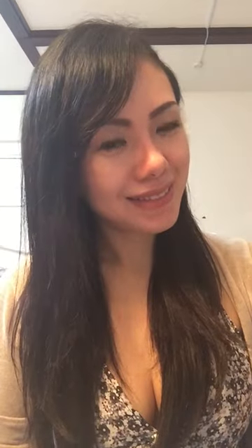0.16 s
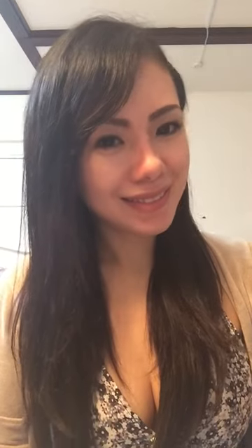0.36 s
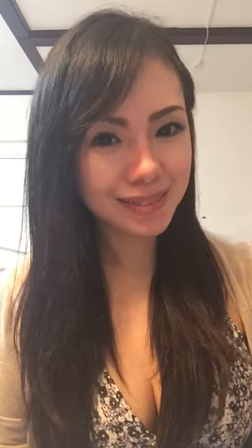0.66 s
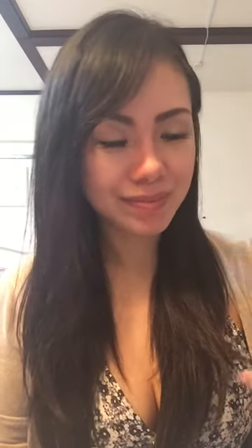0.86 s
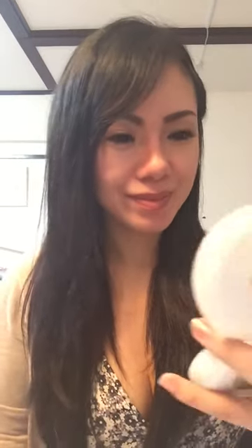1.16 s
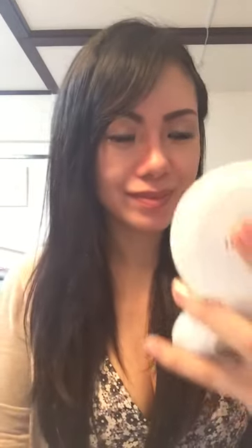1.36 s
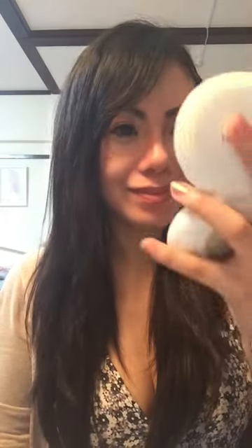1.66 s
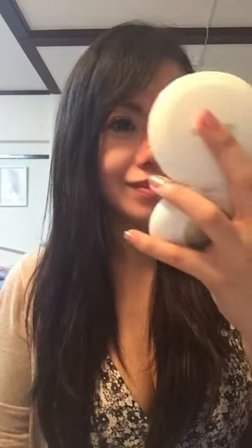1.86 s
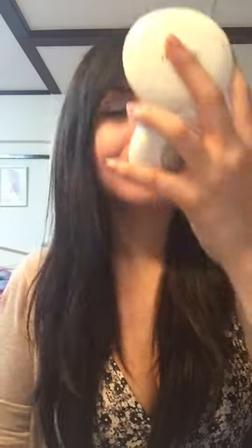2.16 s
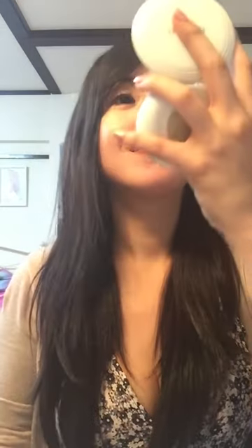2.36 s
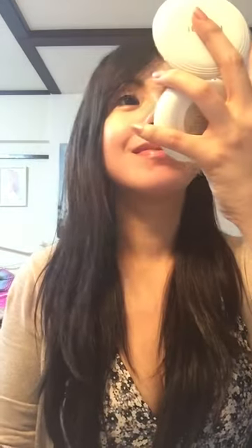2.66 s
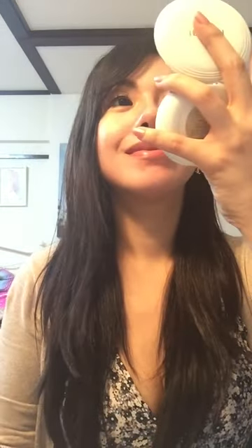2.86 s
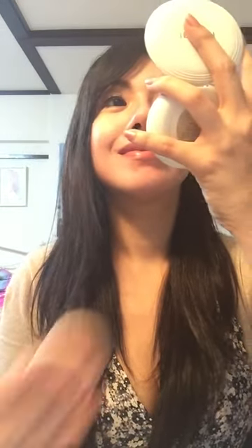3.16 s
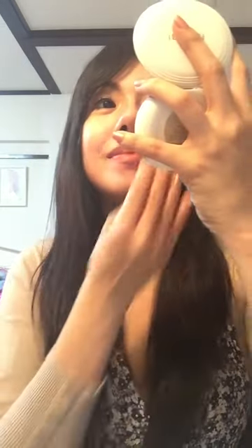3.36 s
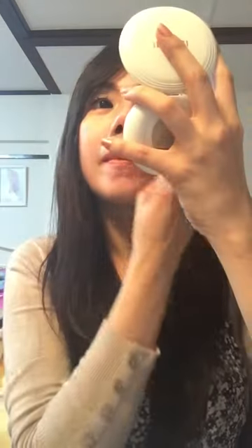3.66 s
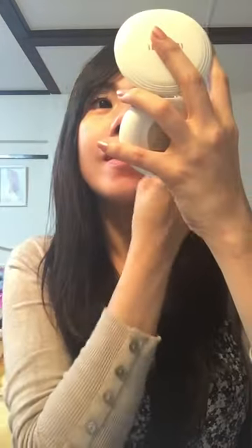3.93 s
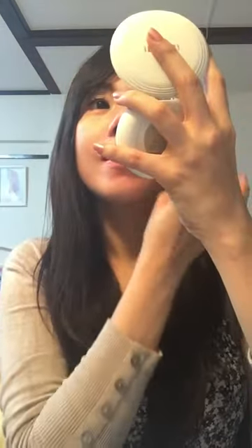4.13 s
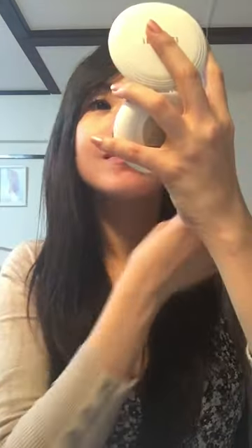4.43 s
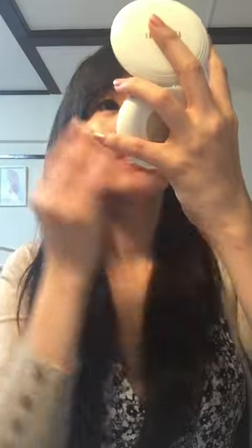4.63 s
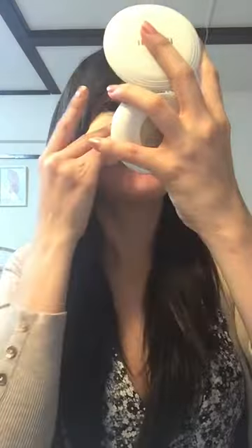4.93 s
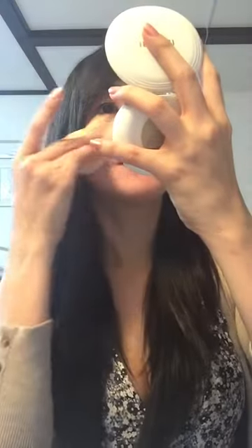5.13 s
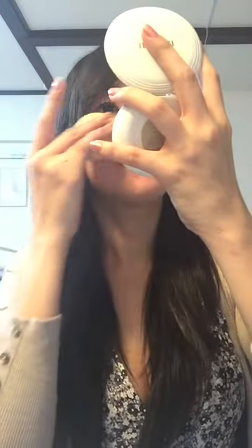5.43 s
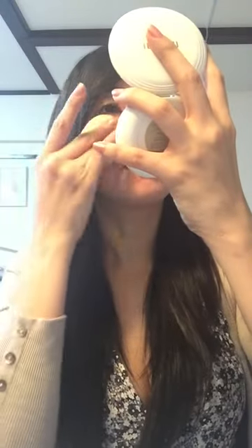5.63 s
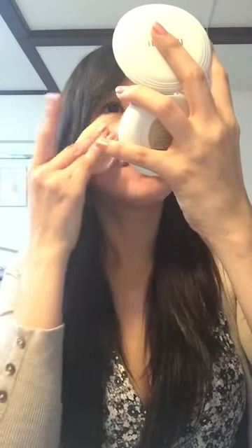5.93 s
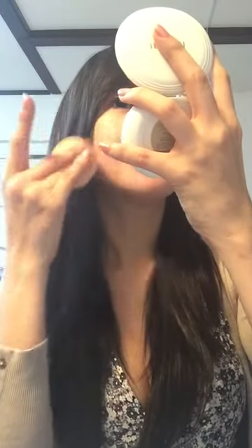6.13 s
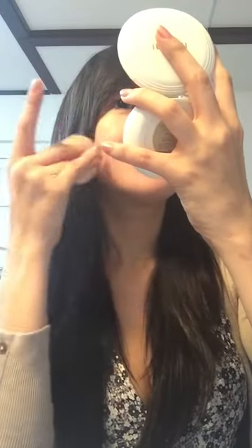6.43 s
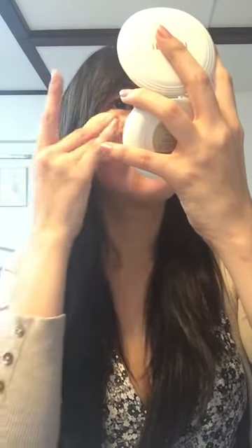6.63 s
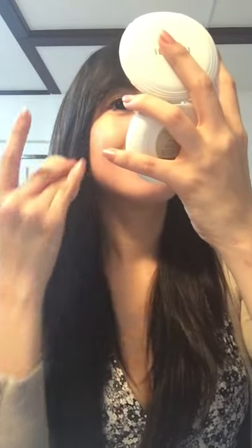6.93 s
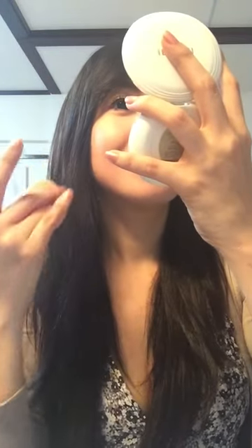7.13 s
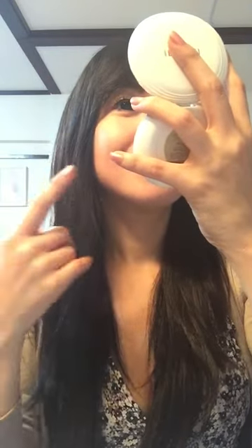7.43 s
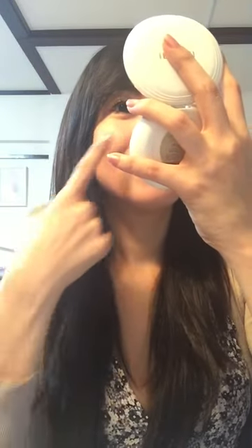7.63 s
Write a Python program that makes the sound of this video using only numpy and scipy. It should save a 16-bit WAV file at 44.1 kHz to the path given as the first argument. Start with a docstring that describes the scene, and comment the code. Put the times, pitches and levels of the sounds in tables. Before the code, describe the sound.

A brief finger slide and low handling bumps open the sound close to the microphone. After a quiet second, stiff plastic film on a small hollow compact crackles in dense bright snaps, then in sparser sharp pops, and finally in a loud crisp flurry. Small soft room, faint hum and hiss behind.

```python
"""A finger sliding off a phone is heard first; sharp snaps and fine rustling of crinkly film stand out.
The film wraps a plastic compact: snaps are short filtered noise bursts, rustle is random pops and
rubbing noise through ringing creases, and the hollow case knocks through its resonances.
A small soft room adds a fading noise tail. The hand on the phone makes resonant sliding noise, low
ringing bumps and a rumble of slipping skin; behind it lies coloured noise, a low hum and microphone hiss."""
import sys
import numpy as np
from scipy import signal
from scipy.fft import rfft, irfft
from scipy.io import wavfile
from scipy.ndimage import uniform_filter1d

SR = 44100
rng = np.random.default_rng(int(sys.argv[2]) if len(sys.argv) > 2 else 0)


def store_wav(level_fs):
    """Save 16-bit WAV to argv[1]."""
    pcm = np.round(np.clip(np.atleast_2d(level_fs), -1, 1) * 32767)
    wavfile.write(sys.argv[1], SR, pcm.T.astype(np.int16))


N = 343759

# the film buckles: t/s, level/dB, body 1-3 kHz relative to it [level/dB],
# treble 7-16 kHz relative to it [level/dB], ring [f/Hz], length [ms]
FILM_SNAPS = [(0.1847, -48, -11, -8, 3380, 2.0), (0.2199, -39, -16, -15, 1990, 3),
              (0.6215, -41.5, -29.5, -17.5, 6400, 1.8), (0.8525, -46.5, -17.5, -19, 6760, 2.0),
              (1.1815, -33.5, -18, -20, 2330, 2.3), (1.2306, -27.5, -13, -13, 1660, 2.4),
              (1.2358, -26.5, -11, -14, 3250, 3), (1.3149, -46, -17, -11, 1570, 2.0),
              (1.3393, -35.5, -17, -18, 1410, 1.6), (1.3616, -37.5, -14, -15, 2960, 2.8),
              (1.5477, -29.5, -19, -24, 5460, 2.3), (1.5688, -15, -18.5, -12.5, 2330, 4.5),
              (1.5828, -19.5, -24, -14, 5400, 1.7), (1.5952, -30.5, -12, -16, 1480, 2.7),
              (1.6072, -17.5, -34.5, -19, 5000, 2.0), (1.6818, -31.5, -19, -12, 1610, 4.2),
              (1.6983, -19.5, -18, -11.5, 2490, 4.6), (1.807, -25.5, -18.5, -12, 2460, 2.5),
              (1.8174, -20.5, -26, -10, 1790, 4.3), (1.8518, -34, -14, -15, 2500, 2.6),
              (1.863, -30.5, -13.5, -9, 2540, 2.6), (1.8923, -39.5, -7, -12, 1530, 2.9),
              (1.9057, -17.5, -25.5, -11, 5500, 4.8), (1.939, -25, -27, -19.5, 4000, 2.6),
              (2.0474, -18, -28.5, -14.5, 6600, 2.5), (2.062, -28.5, -21, -10, 5550, 2.0),
              (2.0717, -24, -23, -16, 7220, 5.1), (2.117, -38, -14, -15, 2240, 2.0),
              (2.146, -34, -15, -6, 4300, 1.7), (2.1558, -15.5, -23.5, -16, 3930, 3.4),
              (2.2188, -30, -18.5, -19, 2250, 3), (2.2538, -34.5, -17, -10, 1990, 2.8),
              (2.2751, -15.5, -29.5, -11.5, 6300, 1.2), (2.2988, -18.5, -30, -21, 3980, 2.2),
              (2.3274, -20, -33, -14, 4740, 2.4), (2.3557, -24.5, -16.5, -11.5, 2280, 4.5),
              (2.3871, -20.5, -31, -8, 7300, 1.4), (2.3949, -18.5, -18.5, -11, 1550, 4.3),
              (2.4927, -43.5, -1.5, -32, 1540, 1.1), (2.5422, -38, -19, -21, 7070, 3.1),
              (2.588, -18.5, -17.5, -14, 3980, 1.9), (2.8044, -39, -13, -12, 2540, 3.4),
              (2.8238, -34, -19, -13, 2530, 3.4), (2.8502, -17.5, -19, -27, 2450, 1.6),
              (2.9157, -30.5, -11.5, -18, 1970, 2.2), (2.9427, -34.5, -12, -13, 1990, 2.5),
              (2.952, -34, -15, -11, 1560, 2.0), (3.001, -25, -17.5, -8.5, 1510, 3.1),
              (3.056, -31, -19, -13, 6860, 2.6), (3.0692, -30.5, -18, -9.5, 3050, 2.0),
              (3.102, -35, -12.5, -5.5, 1910, 2.6), (3.1636, -14, -43, -21, 5140, 1.3),
              (3.2261, -31, -28, -12.5, 3450, 5.3), (3.2492, -23, -29.5, -24, 6440, 2.9),
              (3.2678, -18, -29, -18, 3800, 1.8), (3.504, -9, -31, -18.5, 5230, 2.0),
              (3.516, -28, -33, -13, 5260, 3.9), (3.523, -16.5, -26.5, -22, 3700, 1.8),
              (3.5597, -12.5, -33.5, -12, 6060, 4.8), (3.5852, -17.5, -36.5, -24.5, 4860, 1.7),
              (3.703, -49.5, -8, -18, 1940, 1.5), (3.7591, -29, -22, -15.5, 5130, 2.7),
              (3.7848, -22.5, -26.5, -23, 5300, 2.4), (4.2857, -34, -38.5, -28, 4970, 1.7),
              (4.34, -27, -15.5, -10.5, 2200, 3), (4.3938, -3.5, -33, -18.5, 4380, 2.2),
              (4.4611, -36, -11.5, -30, 2960, 2.3), (4.4878, -34.5, -18, -26, 3130, 2.8),
              (4.977, -38, -33, -14, 2790, 1.6), (4.994, -22, -24.5, -20.5, 4400, 2.5),
              (5.0564, -51, -6, -17, 2180, 1.9), (5.0953, -20.5, -27, -29.5, 4980, 1.4),
              (5.1072, -25.5, -31, -14, 5880, 1.2), (5.1513, -25.5, -29, -12, 5250, 1.4),
              (5.1698, -23.5, -33, -13, 5170, 4.5), (5.1968, -32, -22, -7, 4550, 2.2),
              (5.2119, -13, -31.5, -9.5, 5030, 1.6), (5.223, -15, -38, -27, 4730, 2.0),
              (5.2367, -29, -26, -9, 5300, 2.3), (5.2672, -24, -25.5, -25, 4160, 2.3),
              (5.2867, -37, -11, -18, 4120, 2.9), (5.294, -42, -10, -8, 5000, 2.0),
              (5.308, -22.5, -18.5, -13.5, 4050, 2.0), (5.359, -37.5, -20, -24, 4040, 3),
              (5.3961, -39, -25, -24, 5800, 2.7), (5.448, -10, -34.5, -11, 6000, 1.2),
              (5.585, -33.5, -20, -26, 3260, 2.0), (5.6316, -34, -14.5, -8, 6120, 0.95),
              (5.6362, -7, -34, -15.5, 7000, 2.4), (5.6898, -32.5, -21, -16, 4700, 3.2),
              (5.7124, -35.5, -14, -22, 2850, 1.6), (5.744, -47, -14, -11, 2470, 2.9),
              (5.8853, -10, -47.5, -13, 7500, 1.5), (6.0338, -35, -36, -10.5, 4160, 2.4),
              (6.0778, -43.5, -0.5, -18, 2950, 2.2), (6.0806, -33, -13.5, -6.5, 2860, 2.3),
              (6.1027, -16, -30, -12, 3250, 1.2), (6.1507, -37, -13, -15, 1740, 2.0),
              (6.2256, -21, -24.5, -17, 5600, 2.3), (6.2455, -46, -6, -16, 1930, 2.2),
              (6.256, -34, -13, -21, 1930, 2.0), (6.2954, -30, -21, -16, 2930, 2.5),
              (6.3045, -27.5, -20, -3, 6500, 1.4), (6.3075, -12.5, -27, -10.5, 2800, 2.2),
              (6.3178, -30, -28, 2, 1950, 2.2), (6.3313, -25.5, -11.5, -18, 3670, 2.6),
              (6.351, -22, -23.5, -8, 4600, 2.0), (6.3788, -42, -15, -4.5, 4470, 2.3),
              (6.4145, -17, -26.5, -14, 2030, 2.3), (6.4563, -26.5, -21.5, -8, 3130, 4.4),
              (6.4755, -9.5, -45, -15.5, 6200, 2.5), (6.4956, -30.5, -8.5, -20, 2260, 1.6),
              (6.5609, -9.5, -38, -20, 6160, 2.2), (6.5704, -28, -27, -11, 3400, 2.0),
              (6.6163, -10.5, -34, -11, 7870, 1.6), (6.7888, -47.5, -1, -36, 2000, 2.2),
              (6.9679, -15.5, -22, -10.5, 4900, 3.7), (7.0429, -20.5, -13, -5.5, 1660, 1.05),
              (7.0975, -36, -21, -8, 2510, 2.0), (7.119, -34, -4, -9, 2340, 0.83),
              (7.1334, -37, -12, -5, 5650, 2.0), (7.1513, -18, -22.5, -5, 3450, 1.4),
              (7.1651, -17, -27.5, -9, 4800, 5), (7.1799, -23, -26, -12, 4730, 1.7),
              (7.2109, -23, -25, -11.5, 5220, 2.7), (7.2407, -20.5, -27, -10.5, 3900, 1.4),
              (7.2512, -16.5, -28, -18, 5800, 2.2), (7.263, -20, -28, -10.5, 4530, 2.3),
              (7.2796, -22, -26, -12.5, 6370, 4), (7.3158, -36.5, -14, -13, 1580, 2.9),
              (7.3334, -40, -10, -7, 2290, 1.8), (7.3424, -21.5, -38, -11.5, 6820, 2.6),
              (7.3578, -28.5, -19.5, -3, 6900, 5.1), (7.3811, -0.5, -32, -11.5, 6300, 2.9),
              (7.4033, -12.5, -20, -10.5, 6660, 2.6), (7.4302, -15.5, -17, -10.5, 2270, 2.2),
              (7.4588, -11, -28.5, -15.5, 6340, 3.1), (7.5097, -29, -18.5, -11, 1880, 2.6),
              (7.5323, -26.5, -18.5, -10, 2320, 1.7), (7.5633, -32, -9, -17, 1560, 1.3),
              (7.586, -36, -16, -12, 3540, 2.0), (7.5975, -35, -14, -14, 1700, 2.5),
              (7.6036, -17.5, -24.5, -11, 1530, 2.7), (7.618, -40.5, -1.5, -31, 1550, 2.2),
              (7.627, -35, -13, -13, 1920, 2.0), (7.6468, -38, -14, -14, 1930, 2.0),
              (7.6574, -38, -21, -7, 1610, 2.3), (7.675, -17.5, -26.5, -16, 4640, 2.0),
              (7.7044, -19.5, -29, -19, 3700, 2.4), (7.7133, -13.5, -31, -15.5, 6000, 2.2),
              (7.727, -31, -15.5, -14, 2150, 2.0), (7.7798, -34, -13, -11, 1910, 3.5)]
# borders of the body, middle and treble bands: f/Hz
SNAP_BAND_EDGES = [1100, 3000, 7000, 17000]
# extra decay of body, middle and treble: rate [per length of the snap]
BAND_HASTE = [0, 0.21, 2.1]
# colour of the film's sound: f/Hz, level/dB [per Hz]
FILM_COLOUR = [(410, -32), (700, -1), (1060, -11), (1540, -7), (1680, -4.5), (2400, -5), (3320, -6),
               (4920, -1.5), (7690, -2), (8420, 4.5), (10100, -1.5), (12500, 5.5), (16000, 5)]
HALO_DB, HALO_MS = -33, 2.5  # a faint short noise swells and fades around each snap


def snaps(rise=0.065, fall=1.0, ring_db=8, sharpness=9, crack_db=7.5):
    """Each buckle is a noise burst a few ms long, with a ringing facet and its own level in three bands."""
    size, lead = 1400, 500  # samples in a burst, and how many of them come before the snap
    ms = (np.arange(size) - lead) / SR * 1000
    after = np.maximum(ms, 0)
    halo = from_db(HALO_DB) * np.exp(-abs(ms) / HALO_MS)
    crack = from_db(crack_db) * (ms == 0)  # one sharp click opens the snap
    noises = rng.standard_normal((len(FILM_SNAPS), size))
    out = np.zeros(N + size)
    for row, levels_db, noise in zip(FILM_SNAPS, snap_levels().T, noises):
        s, *_, ring_hz, length_ms = row
        # rise and fall are shares of the snap's length
        shape = (1 - np.exp(-after / (rise * length_ms))) * np.exp(-after / (fall * length_ms))
        burst = coloured(noise * (shape / shape.max() + halo) + crack, FILM_COLOUR)
        rung = burst + resonate(burst, [(ring_hz, ring_hz / sharpness, ring_db)])  # the freed facet rings
        at = round(s * SR)
        for low, high, db, haste in zip(SNAP_BAND_EDGES, SNAP_BAND_EDGES[1:], levels_db, BAND_HASTE):
            source = rung if low < ring_hz else burst  # bands wholly above the ring leave it out
            part = band(source, low, high, order=3) * np.exp(-haste * after / length_ms)
            loudest = uniform_filter1d(part ** 2, 132).max()  # power over its loudest 3 ms
            out[at:at + size] += from_db(db) * part / np.sqrt(loudest)
    return out[lead:N + lead]


# the middle band lies between body and treble, and fills in when both fall short of the top
TOP_DB, MIDDLE_DB, MIDDLE_FILL = -13, -1, 1


def snap_levels():
    """Body, middle and treble level of each snap in dB: its own level plus an offset for each band."""
    _, level_db, body_db, treble_db, *_ = np.transpose(FILM_SNAPS)
    short_db = np.maximum(TOP_DB - np.maximum(body_db, treble_db), 0)
    middle_db = (body_db + treble_db) / 2 + MIDDLE_DB + MIDDLE_FILL * short_db
    return level_db + np.array([body_db, middle_db, treble_db])


def rustle(per_s=1200, spread_db=2.0, clump_db=3.0, split_hz=4500, smooth_db=-8, facet_db=3.0,
           sharpness=3.27):
    """Tiny creases pop at random, in clumps, over rubbing noise; facets of many sizes take turns to ring."""
    dull_gain, bright_gain = rustle_levels()
    sizes = from_db(spread_db * np.minimum(rng.exponential(1, N), 4)) * rng.choice([-1, 1], N)
    pops = rms_one(sizes * (rng.random(N) < per_s / SR)) * from_db(clump_db * drift(39.0))
    rub = pops + from_db(smooth_db) * rng.standard_normal(N)
    facets = np.zeros(N)
    for k, hz in enumerate(np.geomspace(1400, 7000, num=10)):
        stirred = rub * from_db(facet_db * drift(22.0))  # each facet's level wanders by itself
        facets += (-1) ** k * resonate(stirred, [(hz, hz / sharpness, 0)])
    dull = rms_one(band(coloured(facets, FILM_COLOUR), 1340, split_hz))
    bright = rms_one(band(coloured(rub + facets, FILM_COLOUR), split_hz, 12700))
    return dull_gain * dull + bright_gain * bright


# how busily the fingers work the film: t/s, level/dB [before the dull and bright offsets]
FILM_WORK = [(0.0, -47), (0.17, -64), (0.32, -67), (1.17, -66.5), (1.41, -55), (2.3, -46.5), (2.65, -55.5),
             (3.08, -51), (3.32, -63), (4.97, -68), (5.19, -65), (5.86, -61.5), (6.47, -68), (6.72, -75),
             (6.99, -72), (7.14, -36), (7.29, -45.5), (7.79, -40.5)]
WORK_DULL_DB, WORK_BRIGHT_DB = -13.5, -16
# fingers slide on the film: t/s [loudest moment], level/dB [dull part],
# brightness relative to it [level/dB], swell [ms], fade [ms]
FILM_RUBS = [(.092, -50.5, -3, 97, 36), (.24, -68, 12, 23, 40), (.292, -54, 4, 50, 31),
             (1.338, -61.5, 6.5, 44, 120), (1.468, -42, -10, 6.6, 39), (1.561, -46.5, -2, 31, 74),
             (1.93, -53, -4, 81, 67), (2.24, -51, -4, 46, 60), (2.39, -46, -5, 56, 43),
             (2.85, -50, -3.5, 79, 160), (2.95, -52, -8, 63, 80), (3.248, -51, 12.5, 8.3, 32),
             (3.97, -83.5, 14, 80, 140), (4.17, -65.5, 2, 56, 37), (5.02, -54, 11, 22, 24),
             (5.34, -54, 1.5, 60, 17), (6.09, -53, -2, 50, 105), (6.88, -65, 4.5, 22, 17),
             (7.23, -66, 7, 57, 50), (7.42, -48, -6, 40, 60), (7.65, -51, 0, 23, 100)]
RUB_DROP_DB = 15  # lost over the swell and over the fade; the grip uses it too


def rustle_levels():
    """Dull and bright gain of the rustle: the powers of steady work, slides and snap wakes add up."""
    work_db, = in_time(FILM_WORK)
    s, db, bright_db, swell_ms, fade_ms = np.transpose(FILM_RUBS)
    body_db, middle_db, treble_db = snap_levels()
    dull = swells(s, db, swell_ms, fade_ms, RUB_DROP_DB)
    dull += from_db(2 * (work_db + WORK_DULL_DB))
    dull += wake((body_db + middle_db) / 2, AFTER_DULL_DB)
    bright = swells(s, db + bright_db, swell_ms, fade_ms, RUB_DROP_DB)
    bright += from_db(2 * (work_db + WORK_BRIGHT_DB))
    bright += wake(treble_db, AFTER_BRIGHT_DB)
    return np.sqrt(dull), np.sqrt(bright)


# the film rustles around each snap: offsets for a snap of usual level and length
AFTER_DULL_DB, AFTER_BRIGHT_DB, AFTER_MS, BEFORE_MS = -10.5, -20.5, 17.4, 5
USUAL_DB, USUAL_MS = -40, 2
# strong snaps leave a little less wake for their strength, long ones more
AFTER_FOLLOWS, AFTER_DB_PER_DOUBLING = 0.95, 0.5


def wake(db, offset_db):
    """Power of the rustle around the snaps, which grows with their level in one band and their length."""
    s, *_, length_ms = np.transpose(FILM_SNAPS)
    longer_db = AFTER_DB_PER_DOUBLING * np.log2(length_ms / USUAL_MS)
    wake_db = USUAL_DB + AFTER_FOLLOWS * (db - USUAL_DB) + longer_db
    return swells(s, wake_db + offset_db, BEFORE_MS, AFTER_MS, 7.7)


# the hollow case of the compact is knocked: t/s, level/dB [peak], rattle length [ms]
CASE_KNOCKS = [(1.232, -43.5, 18), (1.566, -51, 8), (2.157, -55, 6), (2.391, -41, 7.8), (4.392, -67, 4.2),
               (6.308, -54, 6.6), (6.969, -67, 5.3), (7.382, -33.5, 2.6), (7.403, -45, 9.2),
               (7.432, -44, 4.7)]
# its hollow resonances: f/Hz, width [f/Hz], level/dB
CASE_MODES = [(370, 60, 20.5), (650, 290, 25), (954, 83, -5)]


def knocks(rattle_db=-14):
    """A soft click and a short noisy rattle make the hollow case ring at its own pitches."""
    out, ms = np.zeros(N), np.arange(2000) / SR * 1000
    noises = rng.standard_normal((len(CASE_KNOCKS), len(ms)))
    for (s, db, length_ms), noise in zip(CASE_KNOCKS, noises):
        click = np.exp(-((ms - .4) / 0.25) ** 2)
        rattle = from_db(rattle_db) * noise * np.exp(-ms / length_ms)
        blow = band(resonate(click + rattle, CASE_MODES), 280, 3300)  # a small case sends out little bass
        at = round(s * SR)
        out[at:at + len(ms)] += from_db(db) * blow / abs(blow).max()
    return out


def settling(per_s=25, level_db=-61, spread_db=5.5):
    """The crumpled film ticks faintly by itself: single clicks at random times, coloured by the film."""
    sizes_db = level_db + spread_db * np.minimum(rng.exponential(1, N), 3)
    sizes = from_db(sizes_db) * rng.choice([-1, 1], N)
    return band(coloured(sizes * (rng.random(N) < per_s / SR), FILM_COLOUR), 2000, 15000)


# a finger slides off the phone, one list for each of two strokes: t/s, level/dB [before a 7 dB cut]
SLIDE_STROKES = [
    [(0.0, -40), (0.018, -60), (0.034, -49), (0.096, -41.5), (0.192, -63), (0.2, -78)],
    [(0.21, -84), (0.222, -40.5), (0.26, -53.5), (0.29, -44), (0.328, -51), (0.4, -88)],
]
# what rings with each stroke: f/Hz, width [f/Hz], level/dB
STROKE_RINGS = [
    [(710, 890, -5.5), (1610, 97, -20), (2460, 61, 0), (3530, 560, -1), (3980, 110, 7), (6440, 690, -4)],
    [(600, 52, -3), (1530, 74, 1), (1910, 63, 4.5), (2260, 63, 9.5), (3270, 360, -2.5), (4160, 120, -2)],
]


def slide():
    """Smooth friction noise excites the resonances of each stroke."""
    out, t = 0, np.arange(N) / SR
    for stroke, rings in zip(SLIDE_STROKES, STROKE_RINGS):
        level_db, = in_time(stroke)
        touching = (t >= stroke[0][0]) & (t < stroke[-1][0])
        friction = rms_one(resonate(rng.standard_normal(N), rings))
        out = out + touching * from_db(level_db - 7) * friction
    return out


# fingertips bump the phone: t/s [loudest moment], pitch [f/Hz], level/dB [peak], length [ms]
PHONE_BUMPS = [(0.292, 215, -34, 10), (0.319, 232, -36, 13), (.315, 374, -47.5, 36),
               (0.328, 104.6, -35, 12), (.342, 200, -39, 6.9), (1.077, 268, -51, 10.6),
               (1.235, 275, -45, 9.2), (1.253, 78.2, -49, 10), (1.468, 178, -41.5, 17),
               (1.488, 140.5, -46.5, 15), (1.569, 175, -51, 36), (2.051, 251, -47.5, 6.5),
               (2.143, 110, -49, 13), (2.202, 222, -36, 7.7), (2.222, 94, -42.5, 40),
               (2.254, 249, -39.5, 32), (2.262, 106.5, -43, 69), (2.27, 366, -49.5, 43),
               (2.955, 262, -56, 58), (2.322, 268, -50, 47), (2.369, 241, -50, 8),
               (3.121, 145.6, -41, 13.7), (7.43, 191, -36.5, 5.3)]


def bumps(rise=0.57):
    """A soft touch makes the phone's body ring low: a sine that swells smoothly and soon dies."""
    out, t = np.zeros(N), np.arange(N) / SR
    for (s, hz, db, length_ms), turn in zip(PHONE_BUMPS, rng.random(len(PHONE_BUMPS))):
        near = slice(round((s - .1) * SR), round((s + .2) * SR))
        u = (t[near] - s) * 1000 / length_ms
        swell = np.exp(-np.where(u < 0, u / rise, u / (1 - rise)) ** 2)
        out[near] += from_db(db) * swell * np.sin(2 * np.pi * (hz * t[near] + turn))
    return out


# the hand shifts on the phone: t/s [loudest moment], level/dB [before the lumps], swell [ms], fade [ms]
GRIP_SHIFTS = [(0.01, -58, 30, 57), (.3, -50.5, 65, 64), (.435, -64, 19, 22), (.54, -69, 23, 110),
               (1.08, -69, 45, 76), (1.23, -52.5, 7.6, 82), (1.56, -59, 95, 160), (1.93, -61.5, 210, 83),
               (2.262, -51, 195, 145), (2.41, -50.5, 77, 25), (2.65, -66.5, 240, 43), (3.0, -62, 420, 360),
               (4.402, -55, 7.7, 18), (7.44, -53, 60, 104), (7.6, -61.5, 320, 350)]
# colour of the rumble: f/Hz, level/dB [per Hz]
RUMBLE_COLOUR = [(24, -54), (40, -11), (86, -6), (253, -3), (318, -8), (390, -8), (496, -15), (650, -11.5),
                 (1000, -19), (1300, -84), (2200, -120)]
GRIP_REST_DB = -77  # the rumble that stays between shifts


def grip(lumps_db=4.5):
    """Skin slipping on the phone is low noise whose level wanders in lumps."""
    gain = np.sqrt(swells(*np.transpose(GRIP_SHIFTS), RUB_DROP_DB) + from_db(2 * GRIP_REST_DB))
    rumble = rms_one(coloured(rng.standard_normal(N), RUMBLE_COLOUR))
    return gain * from_db(lumps_db * drift(35.0)) * rumble


# reflections, one row an octave: centre [f/Hz], time to fall 60 dB [t/s], level/dB
ROOM_OCTAVES = [(1026, 0.22, -33.5), (2170, 0.29, -44.5), (4120, 0.26, -41), (8560, 0.19, -40.5),
                (16500, 0.2, -49)]


def room(x, gap_ms=2.7, early_db=10.0, early_t60=0.039, grain_db=3.0):
    """Reflections are noise dying in each octave; near surfaces add a quicker, grainy first part."""
    s = np.arange(SR // 2) / SR
    grains = rng.exponential(1, len(s) // 30).clip(0, 4)  # each holds for 30 samples
    echoes = rms_one(from_db(grain_db * np.repeat(grains, 30)))
    early = from_db(early_db - 60 * s / early_t60) * echoes
    tail = 0
    for hz, t60, db in ROOM_OCTAVES:
        fade = from_db(-60 * s / t60) + early
        noise = rng.standard_normal(len(s)) * fade * (s * 1000 > gap_ms)
        tail = tail + from_db(db) * band(noise, hz / np.sqrt(2), hz * np.sqrt(2))
    return signal.fftconvolve(x, tail)[:N]


# colour of the hum and hiss: f/Hz, level/dB [per Hz]
AIR_COLOUR = [(25, -43), (45, 0), (86, 4.5), (125, -1), (255, -8.5), (320, -11), (1030, -18.5), (1270, -15),
              (2670, -24.5), (8090, -26.5), (10300, -30.5), (12000, -26.5), (15600, -27.5)]
AIR_DB = -67.5


def air():
    """Room hum and microphone hiss are one steady coloured noise with a slightly wandering level."""
    gain = from_db(AIR_DB + 0.5 * drift(9.0))
    return gain * rms_one(coloured(rng.standard_normal(N), AIR_COLOUR))


def from_db(db):
    """Decibels to gain."""
    return 10 ** (np.asarray(db) / 20)


def rms_one(x):
    """Scale to an average strength (rms) of 1."""
    return x / np.sqrt(np.mean(x ** 2) + 1e-20)


def in_time(rows):
    """Join the points of each column by straight lines, giving one value a sample."""
    s, *columns = np.transpose(rows)
    return [np.interp(np.arange(N) / SR, s, c) for c in columns]


def band(x, low_hz, high_hz, order=2):
    """Keep the sound between two frequencies (Butterworth band-pass)."""
    edges = [low_hz, min(high_hz, SR * .49)]
    return signal.sosfilt(signal.butter(order, edges, "band", fs=SR, output="sos"), x)


def coloured(x, spectrum):
    """Filter to the given spectrum in minimum phase, so that nothing sounds early."""
    hz, db = np.transpose(spectrum)
    grid = np.fft.rfftfreq(8192, 1 / SR)
    cepstrum = irfft(np.log(from_db(np.interp(np.log(grid + 1), np.log(hz), db))))
    # folding the cepstrum onto its first half gives minimum phase
    cepstrum[1:4096] *= 2
    cepstrum[4097:] = 0
    return signal.fftconvolve(x, irfft(np.exp(rfft(cepstrum))))[:len(x)]


def drift(rate):
    """Slow random wander of rms 1: noise smoothed twice at the given rate in Hz."""
    r = np.exp(-2 * np.pi * rate / SR)
    return rms_one(signal.lfilter([1], [1, -2 * r, r * r], rng.standard_normal(N + SR))[SR:])


def resonate(x, modes):
    """Ring at several pitches side by side (two-pole resonances), with alternating signs."""
    out = 0
    for k, (hz, width_hz, db) in enumerate(modes):
        r = np.exp(-np.pi * width_hz / SR)
        a = [1, -2 * r * np.cos(2 * np.pi * hz / SR), r * r]
        b = [(1 - r * r) / 2, 0, (r * r - 1) / 2]
        out = out + (-1) ** k * from_db(db) * signal.lfilter(b, a, x)
    return out


def swells(s, db, swell_ms, fade_ms, drop_db):
    """Power of gestures that grow to a top and die away, losing drop_db over each swell or fade time."""
    steps = np.arange(N // 32 + 1)  # one value every 32 samples
    power, ms = np.zeros(len(steps)), steps * 32000 / SR
    for at, top_db, up, down in zip(*np.broadcast_arrays(s, db, swell_ms, fade_ms)):
        away = ms - 1000 * at
        power += from_db(2 * (top_db - drop_db * np.where(away < 0, -away / up, away / down)))
    return np.interp(np.arange(N) / 32, steps, power)


def scene():
    """Film and case with their reflections, the hand on the phone, the air."""
    film = snaps() + rustle() + knocks() + settling()
    hand = slide() + bumps() + grip()
    return (film + room(film) + hand + air())[None]


def record(dry):
    """The loudest peaks are rounded, and the top is cut by 70 dB from 16640 Hz up."""
    rounded = .85 * np.tanh(dry / .85)
    return signal.sosfilt(signal.cheby2(14, 70, 16640, fs=SR, output="sos"), rounded)


dry = scene()
out = record(dry)
store_wav(out)
```